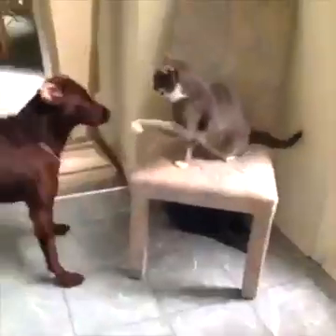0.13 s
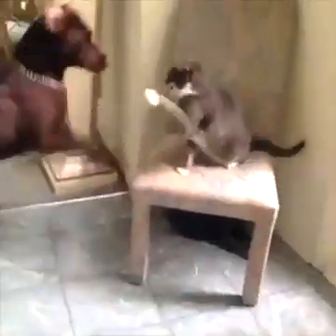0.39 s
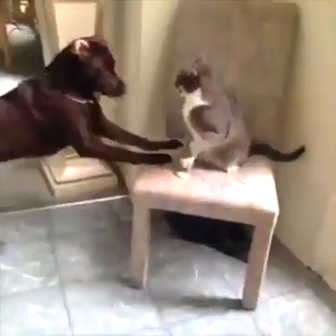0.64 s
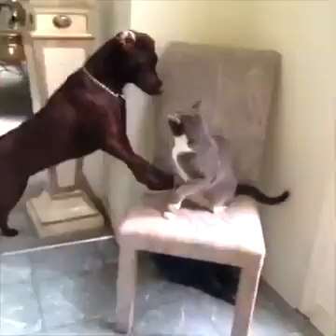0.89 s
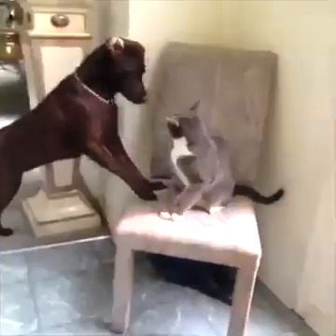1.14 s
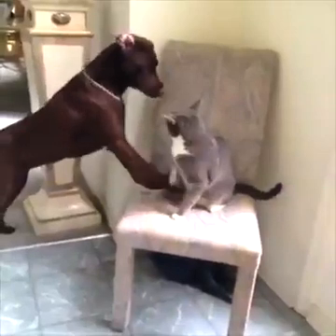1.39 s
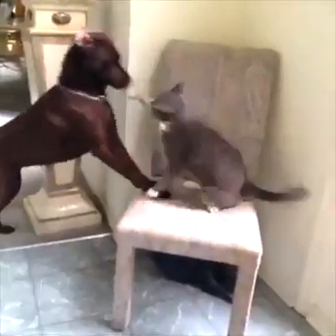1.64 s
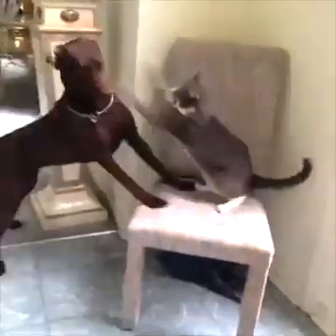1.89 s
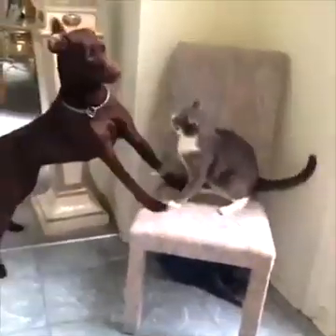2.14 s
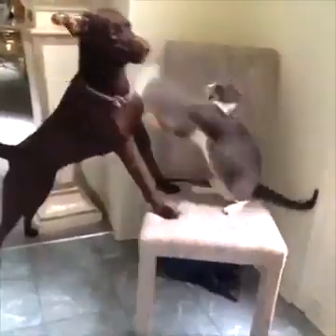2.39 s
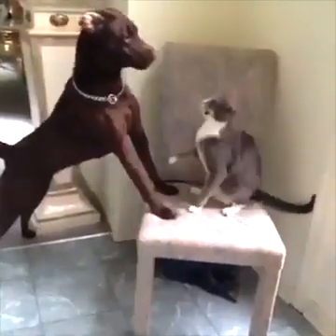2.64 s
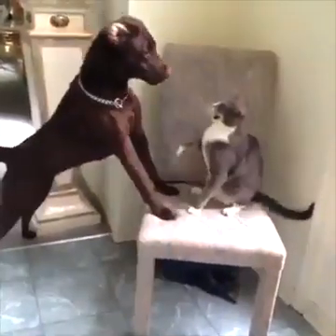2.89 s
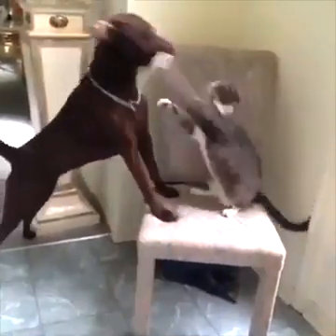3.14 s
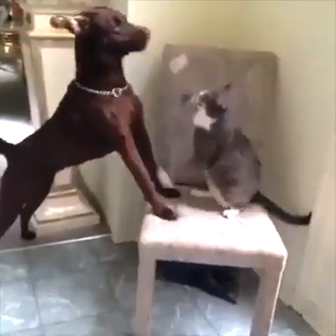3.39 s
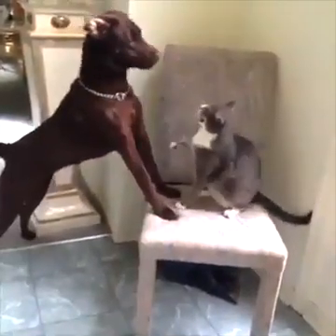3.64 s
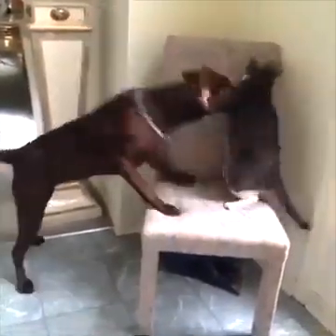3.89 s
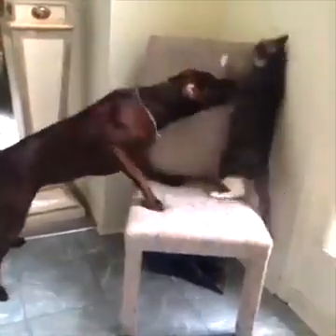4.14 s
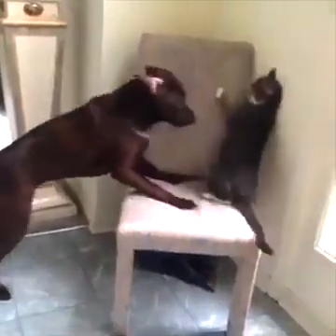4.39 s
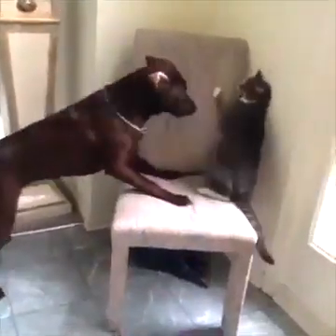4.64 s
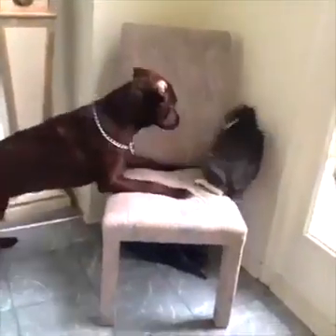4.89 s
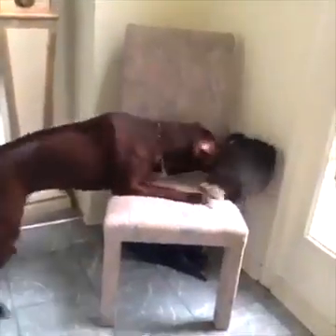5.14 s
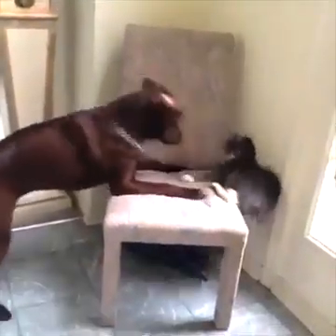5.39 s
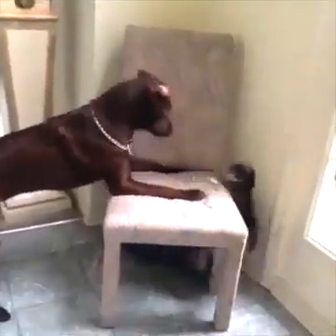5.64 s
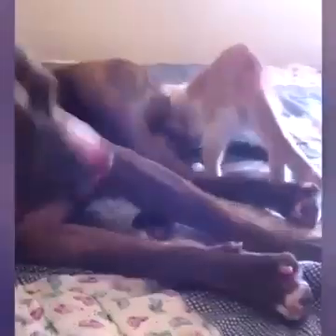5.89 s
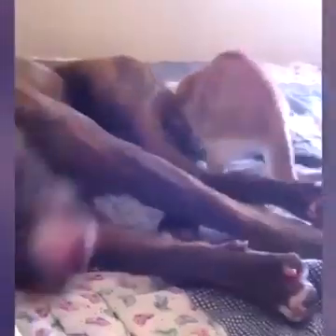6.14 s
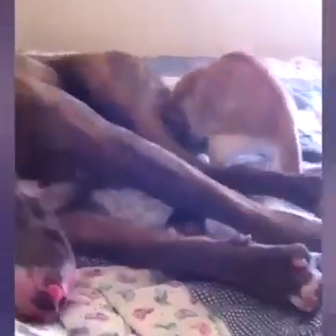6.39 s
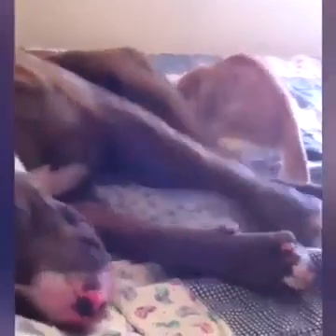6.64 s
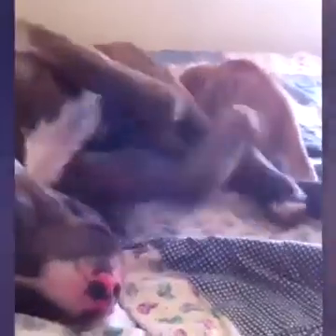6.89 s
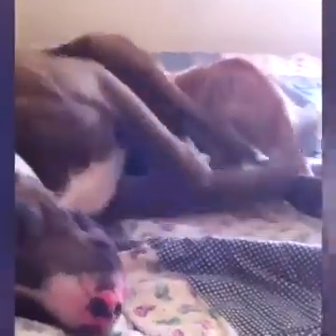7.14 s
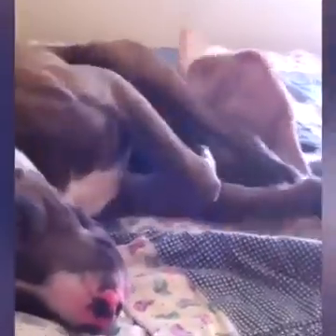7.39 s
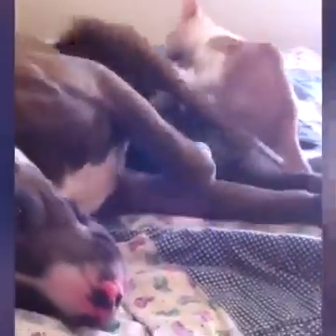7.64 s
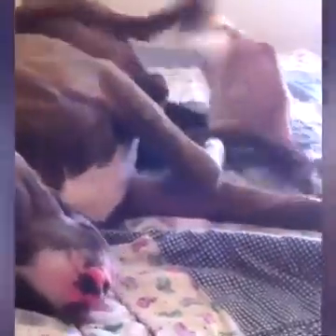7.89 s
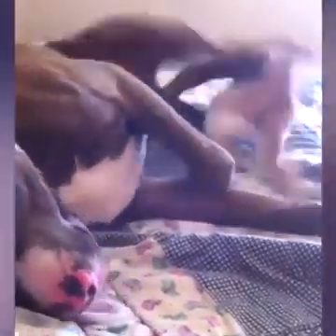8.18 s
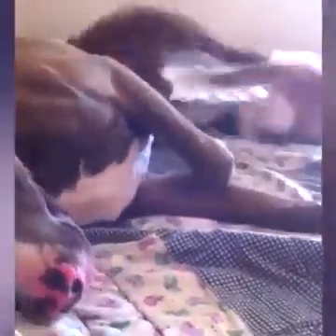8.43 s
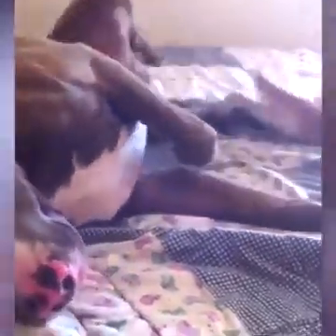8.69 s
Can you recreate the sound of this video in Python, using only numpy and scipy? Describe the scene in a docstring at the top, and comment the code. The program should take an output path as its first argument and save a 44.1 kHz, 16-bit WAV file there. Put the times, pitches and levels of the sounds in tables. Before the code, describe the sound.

Bursts of grainy claw scrabbling and woody knocks come first, then a lull of faint shuffling and airy cat hisses. A sharp knock breaks it, followed by violent banging, rasping paw drags and rattling stool legs with a short bright room echo. A quick switch brings a much quieter, drier bedroom: one brisk cloth crumple, softer rustles and muffled mattress thumps. Plain close phone-like pickup, little deep bass.

```python
"""Scuffle on a stool, then a bedroom

A dog and a cat scuffle on a padded wooden stool in a tiled room: blows ring its modes, stick-slip judders its legs,
claws and fur scrape as grainy noise, the cat hisses thinly as high noise. A filter removes the scuffle's deep bass.
Then a cut to a quiet bedroom, where bedding rustles under two animals in bursts of grains and dull thumps."""
import sys
import numpy as np
from scipy import signal
from scipy.fft import rfft, irfft, next_fast_len
from scipy.io import wavfile
from scipy.ndimage import uniform_filter1d, map_coordinates

SR = 44100
rng = np.random.default_rng(int(sys.argv[2]) if len(sys.argv) > 2 else 0)


def digitize_waveform(pressure):
    """Quantize a signal to 16-bit integers and store it at the path in sys.argv[1].

    Rows of a 2-D input are taken as channels; values are limited to [-1, 1].
    """
    field = np.atleast_2d(pressure).T
    bounded = np.clip(field, -1, 1)
    quanta = np.round(bounded * 32767).astype(np.int16)
    wavfile.write(sys.argv[1], SR, quanta)


def natural_amplitude(level_db):
    """Convert a level in decibels to a linear amplitude factor, elementwise."""
    exponent = np.asarray(level_db, float) / 20
    return 10 ** exponent


N = 387706
T = np.arange(N) / SR
CUT_S = 5.775  # tiled room to bedroom

# Blows of paws, claws and stool legs. Each row: time in seconds, peak of the frame knock in dB,
# level of the claw crack in dB, strongest pitch in Hz.
BLOWS = [(0.198, -39, -56, 316), (0.216, -24.5, -19.5, 290), (0.288, -27.5, -36, 200),
         (0.372, -26.5, -41, 237), (0.561, -35, -27, 1270), (0.59, -19.5, -15, 840),
         (0.892, -19.5, -27, 637), (1.166, -17, -59, 596), (1.176, -14.5, -55, 620), (1.205, -23, -58, 171),
         (1.26, -25.5, -60, 180), (1.506, -28, -65, 635), (1.655, -18.5, -29.5, 720),
         (1.709, -16, -27, 1180), (1.726, -19, -40, 300), (1.805, -27, -25, 620), (2.515, -30, -50, 590),
         (2.701, -24.5, -48, 343), (2.737, -36, -50, 800), (3.161, -7.5, -23, 820), (3.201, -22, -60, 790),
         (3.233, -16, -53, 790), (3.238, -26, -62, 178), (3.263, -21.5, -36, 432), (3.487, -35, -46, 644),
         (4.034, -31, -36.5, 640), (4.09, -21, -37, 790), (4.256, -6.5, -38, 844), (4.262, -11, -67, 211),
         (4.377, -4, -12, 1030), (4.585, -14.5, -30, 700), (4.614, -11.5, -23.5, 1010),
         (4.645, -26.5, -49, 630), (4.68, -22, -57, 820), (4.895, -22, -49, 790), (5.174, -16, -45, 750),
         (5.184, -15.5, -39, 437), (5.224, -15, -26, 870), (5.242, -13.5, -18.5, 607),
         (5.266, -17.5, -14.5, 1190), (5.392, -4, -26, 1110), (5.408, -8, -23, 990),
         (5.531, -21.5, -33, 630), (5.574, -18.5, -52, 304), (5.598, -17, -55, 300),
         (5.641, -12.5, -28, 946), (5.667, -18, -27, 800), (5.672, -18, -53, 247), (5.749, -18, -47, 695)]
# Modes of the seat. Each row: frequency in Hz, nominal width in Hz, relative level in dB.
SEAT_MODES = [(45, 84, -4), (151.3, 75, -1), (209, 62, 2), (335, 159, -1.5)]
# Modes of legs and rails. Each row: frequency in Hz, nominal width in Hz, relative level in dB.
LEG_MODES = [(424.4, 61, 1.4), (637.4, 100, 2.8), (790, 175, 3.44), (979, 137, -3.7), (1222, 162, -2.4)]
# Faint shuffling between the bouts. Each row: time in seconds, stool level in dB, cloth level in dB.
SHUFFLE = [(0, -62, -57), (1.0, -54.5, -62), (1.45, -58.5, -60), (1.58, -59, -56), (1.95, -52, -57.5),
           (2.3, -69, -64.5), (2.34, -55, -59.5), (2.75, -52, -56), (2.77, -92, -69), (3.07, -82, -61.5),
           (3.4, -62, -60), (3.6, -77, -64.5), (3.72, -56.5, -60.5), (3.92, -67, -56.5), (4.87, -56.5, -63),
           (5.1, -59.5, -61)]


def unit(x):
    """Scaled to rms 1."""
    return x / np.sqrt(np.mean(x ** 2) + 1e-20)


def along(points, hz):
    """(Hz, value) points interpolated on a log frequency axis."""
    f, v = np.transpose(points)
    return np.interp(np.log(hz + 1), np.log(f + 1), v)


def curves(rows):
    """One value per sample for each column after the time."""
    s, *cols = np.transpose(rows)
    return [np.interp(T, s, c) for c in cols]


def filtered(x, response):
    """x times a complex response of frequency."""
    m = next_fast_len(len(x) + 8192)
    return irfft(rfft(x, m) * response(np.fft.rfftfreq(m, 1 / SR)), m)[:len(x)]


def coloured(x, spectrum):
    """x filtered by a spectrum of (Hz, dB), rms 1."""
    return unit(filtered(x, lambda hz: natural_amplitude(along(spectrum, hz))))


def wobble(rate):
    """A smooth random curve, rate knots a second."""
    return map_coordinates(rng.standard_normal(int(N * rate / SR) + 4), [T * rate])


def grains(rate, spread_db, smooth):
    """Random single contacts, rate a second, of uneven size on a bed of smooth friction noise, rms 1."""
    chance, size = rng.random(N), rng.exponential(size=N)
    sign, bed = rng.standard_normal(N), rng.standard_normal(N)
    height = natural_amplitude(spread_db * np.minimum(size, 2.5)) * np.sign(sign)
    contacts = unit((chance < rate / SR) * height)
    return unit(contacts + smooth * bed)


def patchy(x, depth_db):
    """Random gain patches a few hundred Hz wide and some tens of ms long, rms 1."""
    z = signal.stft(x, nperseg=512)[2]
    field = uniform_filter1d(rng.standard_normal(z.shape), size=3, axis=0)
    field = uniform_filter1d(field, size=9, axis=1)
    return unit(signal.istft(z * natural_amplitude(depth_db * unit(field)), nperseg=512)[1][:N])


def resonant(x, modes, twice=False):
    """x through the causal response of (Hz, width, dB) modes, rms 1; twice: first mode only, two times."""
    def mode(hz, centre, width, db):
        return natural_amplitude(db) * 1j * hz * width / (centre * centre - hz * hz + 1j * hz * width)

    def response(hz):
        if twice:
            return mode(hz, *modes[0]) ** 2
        return sum((-1) ** k * mode(hz, *m) for k, m in enumerate(modes))

    return unit(filtered(x, response))


def bursts(rows, fade, bed_db, axis):
    """Gain of one layer: the energy of all its events, by one rule of swell, sag and release, over a faint bed."""
    swell_db, sag_db_per_s, release_db_per_s = fade  # swell_db: gained over one rise
    stop_s = 2.757  # bursts begun earlier are cut dead here
    power = natural_amplitude(2 * bed_db)
    for row in rows:
        peak_s, rise_s, lasts_s = row[0], max(row[1], .002), max(row[2], 0)
        limit_s = stop_s if peak_s < stop_s else CUT_S + 1
        first = max(round((peak_s - 2 * rise_s) * SR), 0)
        last = round(min(peak_s + lasts_s + .5, limit_s) * SR)
        t = T[first:last] - peak_s
        fall_db = sag_db_per_s * np.minimum(t, lasts_s) + release_db_per_s * np.maximum(t - lasts_s, 0)
        loss_db = np.where(t < 0, -swell_db * t / rise_s, fall_db)
        power[first:last] += natural_amplitude(2 * (row[axis] - loss_db))
    return np.sqrt(power)


def still_air():
    """The hush of each room: coloured noise whose level drifts."""
    # Each row: frequency in Hz, relative level per Hz in dB.
    tiled_spectrum = [(50, -46), (90, -35.5), (140, 1), (500, 2.5), (1000, -2.5), (3000, -22),
                      (8500, -42.5), (9400, -20), (9550, -70.5)]
    # Each row: frequency in Hz, relative level per Hz in dB.
    bedroom_spectrum = [(15, -48), (28, -8), (60, -29), (115, -1), (400, -2.5), (900, -7.5), (3800, -17),
                        (7800, -19), (8050, -33), (8600, -31), (8800, -77)]
    tiled = natural_amplitude(-57.5 + 5.0 * wobble(3.11)) * coloured(rng.standard_normal(N), tiled_spectrum)
    bedroom = patchy(coloured(rng.standard_normal(N), bedroom_spectrum), depth_db=2.5)
    return tiled, natural_amplitude(-58.5 + .6 * wobble(4)) * bedroom


def tiled_room(x):
    """The hard room's answer: a noise tail in which each frequency dies at its own speed."""
    # Decay of the tiled room. Each row: frequency in Hz, t60 in seconds.
    room_decay = [(150, 0.23), (1000, 0.38), (8000, 0.57)]
    hz, t, z = signal.stft(rng.standard_normal(SR // 2), SR, nperseg=256)
    fading = z * natural_amplitude(-60 * t / along(room_decay, hz)[:, None])
    tail = signal.istft(fading, SR, nperseg=256)[1]
    delayed = np.pad(x, (250, 0))  # samples
    return signal.fftconvolve(delayed, tail / np.linalg.norm(tail))[:N]


def bedding():
    """Cloth crumples in short grainy bursts; the mattress gives a dull thump."""
    # Pushes of limbs. Each row: start in seconds, crumple level in dB before trim, thump level in dB,
    # rise time constant in seconds, t60 in seconds.
    push_rows = [(6.7694, -42, -56, 0.022, 0.44), (7.014, -30.5, -49.5, 0.0059, 0.32),
                 (7.339, -39.5, -52.5, 0.0062, 0.24), (7.6494, -43.5, -59, 0.0085, 0.23),
                 (7.8594, -49, -65, 0.0054, 0.26), (8.2094, -47, -70, 0.0096, 0.74),
                 (8.345, -47, -43.5, 0.0085, 0.29), (8.503, -41.5, -57, 0.0037, 0.62)]
    # Each row: frequency in Hz, relative level per Hz in dB.
    cloth_spectrum = [(240, -42), (400, -11), (770, 8), (2500, 2.5), (7800, -4), (8050, -23), (8700, -18),
                      (9000, -74)]
    crumple_trim_db = -10.0
    crumple, thump = np.zeros(N), np.zeros(N)
    for start_s, crumple_db, thump_db, rise_s, t60_s in push_rows:
        t = np.maximum(T - start_s, 0)
        shape = (1 - np.exp(-t / rise_s)) * natural_amplitude(-60 * t / t60_s)
        crumple += natural_amplitude(crumple_db + crumple_trim_db) * shape
        thump += natural_amplitude(thump_db) * shape
    for snap_s in (7.016, 7.028):  # a claw snaps free of the weave, twice
        crumple += natural_amplitude(-37.0 - 60 * np.abs(T - snap_s) / 0.0085)
    cloth = coloured(grains(rate=1300, spread_db=-4.0, smooth=3.1), cloth_spectrum)
    mattress_spectrum = [(80, -33), (180, -1.5), (450, -3.5), (1300, -18.5), (2500, -57)]
    mattress = coloured(rng.standard_normal(N), mattress_spectrum)
    return crumple * cloth + thump * mattress


def hisses():
    """Air forced past the cat's teeth: smooth, high noise with a quick start."""
    # Each row: start in seconds, length in seconds, level in dB.
    hiss_rows = [(2.273, 0.49, -53.5), (2.886, 0.24, -59.5), (3.654, 0.22, -54.5), (3.993, 0.02, -42.5)]
    # Each row: frequency in Hz, relative level per Hz in dB.
    hiss_spectrum = [(4500, -61), (6500, 2), (8000, 8), (9400, 7), (9550, -63)]
    breath = np.zeros(N)
    for start_s, length_s, db in hiss_rows:
        onset = np.clip((T - start_s) / 0.011, 0, 1)
        ending = np.clip((start_s + length_s - T) / 0.007, 0, 1)
        breath += natural_amplitude(db) * onset * ending
    flutter = natural_amplitude(1.5 * wobble(25))
    return breath * flutter * patchy(coloured(rng.standard_normal(N), hiss_spectrum), depth_db=1.5)


def rubbing():
    """Claws tear over the weave in small even grains; fur adds a treble that clumps slightly, pads a dull rasp."""
    # Strokes of claws and fur. Each row: peak in seconds, rise in seconds (at least 2 ms is used),
    # drag time in seconds, scrape level in dB, fizz level in dB.
    stroke_rows = [(0, .01, 0, -50.5, -42), (.1, 0.049, 0, -62, -30.5), (.203, 0.018, 0.1, -29, -21.5),
                   (.356, 0.034, 0.32, -27.5, -27), (.51, 0.044, 0.023, -41, -32.5),
                   (.592, 0.00089, 0.04, -24.5, -25), (.619, 0.072, 0.11, -29, -31.5),
                   (.829, 0.043, 0.09, -24, -23), (1.18, 0.018, 0.082, -34, -52),
                   (1.614, 0.016, 0.008, -46, -44), (1.7, 0.049, 0.18, -31, -35),
                   (2.53, 0.048, 0.19, -55, -48.5), (2.62, 0.018, 0.065, -57, -42.5),
                   (3.162, 0.003, 0.2, -40, -39), (3.374, 0.12, 0.11, -47.5, -41),
                   (3.69, 0.043, .25, -54, -58), (4.094, 0.063, 0.036, -29, -33.5),
                   (4.21, 0.061, 0.13, -38, -56), (4.335, 0.011, 0.16, -32.5, -34),
                   (4.376, 0.056, 0.08, -25, -32), (4.448, 0.012, 0.18, -28.5, -28),
                   (4.616, 0.0029, 0.1, -31.5, -39), (4.897, 0.0055, 0.033, -36, -62),
                   (4.935, 0.013, 0, -34, -53), (5.242, 0.045, 0.1, -22.5, -31.5),
                   (5.395, 0.0093, 0, -20.5, -26.5), (5.43, 0.013, 0.11, -25.5, -31.5),
                   (5.59, 0.043, 0.13, -40.5, -46), (5.641, 0.0053, 0.19, -31.5, -41),
                   (5.72, 0.2, 0.18, -43, -48)]
    # Quick flicks of a claw. Each row: peak in seconds, scrape level in dB, fizz level in dB.
    flick_rows = [(0.164, -62, -24.5), (1.175, -32, -64), (1.655, -25.5, -39), (2.737, -29, -33),
                  (4.614, -21, -52), (5.182, -18.5, -35.5)]
    # Paw pads dragged heavily over the cushion. Each row: peak in seconds, rise in seconds,
    # drag time in seconds, level in dB.
    drag_rows = [(.593, 0.006, 0.017, -28.5), (1.7, 0.069, 0.14, -30), (4.21, 0.034, 0.03, -37.5),
                 (4.26, 0.011, 0.094, -34), (4.93, 0.025, 0.024, -45), (5.24, 0.023, 0.05, -22.5),
                 (4.39, 0.024, 0.053, -30.5), (4.62, 0.0042, 0.062, -30.5), (5.43, 0.029, 0.044, -27),
                 (5.645, .005, 0.14, -31.5)]
    # Claw scrape. Each row: frequency in Hz, relative level per Hz in dB.
    scrape_spectrum = [(600, -43.5), (1150, -12.5), (1500, -2.5), (2250, 1), (3700, -3.5), (4200, -12),
                       (6500, -19.5), (9400, -23.5), (9550, -86)]
    # Fur fizz. Each row: frequency in Hz, relative level per Hz in dB.
    fizz_spectrum = [(2500, -21.5), (4200, -1.5), (6000, -3.5), (8500, -9), (9400, -5.5), (9550, -47.5)]
    # Dull pads. Each row: frequency in Hz, relative level per Hz in dB.
    drag_spectrum = [(500, -27), (900, 10), (1500, 18), (2200, 12), (2800, -50.5)]
    # fades: swell in dB, sag in dB/s, release in dB/s
    scrape_fade, fizz_fade, flick_fade = (15.9, 63, 210), (17.6, 90, 237), (28, 0, 1900)
    no_bed_db = np.full(N, -120.)
    cloth_db = curves(SHUFFLE)[1]
    flicks = [(s, 0.002, 0, scrape_db, fizz_db) for s, scrape_db, fizz_db in flick_rows]  # 2 ms rise
    claws = bursts(stroke_rows, scrape_fade, cloth_db, axis=3)
    claws += bursts(flicks, flick_fade, no_bed_db, axis=3)
    fur = bursts(stroke_rows, fizz_fade, cloth_db - 5, axis=4)  # shuffling: fizz 5 dB under scrape
    fur += bursts(flicks, flick_fade, no_bed_db, axis=4)
    unevenness = wobble(45)
    scrape = patchy(coloured(grains(rate=700, spread_db=2.5, smooth=1.5), scrape_spectrum), depth_db=1.8)
    fizz = patchy(coloured(grains(rate=1200, spread_db=1, smooth=1.45), fizz_spectrum), depth_db=1.5)
    rasp = coloured(grains(rate=600, spread_db=5.5, smooth=1.1), drag_spectrum)
    pads = bursts(drag_rows, scrape_fade, no_bed_db, axis=3) * rasp
    return pads + claws * natural_amplitude(0.074 * unevenness) * scrape + fur * natural_amplitude(2.0 * unevenness) * fizz


def rail_shares():
    """Gain of each rail mode over time: those nearest the pitch of the last blow on the rails judder most."""
    near_db_per_octave = 6.5
    rail_blows = [blow for blow in BLOWS if blow[-1] > SEAT_MODES[-1][0] * 1.2]
    blow_s, *_, struck_hz = np.transpose(rail_blows)
    share = np.array([natural_amplitude(db - near_db_per_octave * np.abs(np.log2(hz / struck_hz)))
                      for hz, _, db in LEG_MODES[:-1]])
    share /= np.sqrt(np.sum(share ** 2, axis=0))
    last_blow = np.maximum(np.searchsorted(blow_s, T) - 1, 0)
    return share[:, last_blow]


def judder():
    """The legs stick and slip at uneven moments; every slip rings the seat, and the rails that were struck last."""
    # Jolts of the stool. Each row: peak in seconds, rise in seconds (at least 2 ms is used),
    # judder time in seconds, seat thud level in dB, leg judder level in dB.
    jolt_rows = [(.012, 0.037, 0.02, -33.5, -44.5), (.228, 0.05, 0.042, -32.5, -56),
                 (.39, 0.064, 0.017, -38, -40), (.46, 0.11, 0.19, -47, -43),
                 (.592, 0.0069, 0.26, -42.5, -37), (.843, 0.072, 0.038, -32, -46),
                 (.891, 0.063, 0.054, -34.5, -31.5), (1.185, 0.02, 0.058, -31.5, -29),
                 (1.267, 0.098, 0.023, -32, -35.5), (1.506, 0.0034, 0.018, -45, -55),
                 (1.66, 0.018, 0.14, -31.5, -34), (1.742, 0.11, 0.089, -27.5, -30),
                 (3.17, 0.008, 0.06, -31.5, -34), (3.3, 0.15, 0.021, -35.5, -40.5),
                 (3.594, 0.058, 0.03, -49.5, -74), (4.056, 0.044, 0.26, -31.5, -34.5),
                 (4.2, 0.29, 0, -42, -37.5), (4.28, 0.013, 0.11, -28.5, -34), (4.404, 0.17, 0.18, -24, -20),
                 (4.615, 0.0049, 0.042, -31, -23), (4.677, 0.053, 0.12, -54, -29.5),
                 (4.896, 0.0027, 0.1, -59, -27.5), (4.97, 0.066, 0, -37.5, -28),
                 (5.176, 0.0026, 0.02, -34, -23), (5.236, 0.041, 0.18, -19, -18),
                 (5.393, 0.002, 0.17, -23.5, -19), (5.549, 0.11, 0.08, -24, -28),
                 (5.67, 0.018, 0.14, -28, -27.5)]
    seat_fade, legs_fade = (18, 90, 290), (15.8, 90, 450)  # swell in dB, sag in dB/s, release in dB/s
    slip_damping = 1.6  # rubbing legs ring broader than struck ones
    stool_db = curves(SHUFFLE)[0]
    thud = bursts(jolt_rows, seat_fade, stool_db - 3, axis=3)  # shuffling: seat 3 dB under legs
    shake = bursts(jolt_rows, legs_fade, stool_db, axis=4)
    slips = grains(rate=300, spread_db=1.0, smooth=1.47)
    seat = patchy(resonant(resonant(slips, SEAT_MODES[1:]), SEAT_MODES[1:]), depth_db=3.0)
    legs = np.zeros(N)
    for share, (hz, width_hz, _) in zip(rail_shares(), LEG_MODES):
        legs += share * resonant(slips, [(hz, slip_damping * width_hz, 0)], twice=True)
    return natural_amplitude(1.93 * wobble(40)) * (thud * seat + shake * unit(legs))


def blows():
    """Each blow rings the stool's modes nearest its pitch, with a short crack of claw or leg on top."""
    # Each row: frequency in Hz, relative level per Hz in dB.
    crack_spectrum = [(600, -47), (1500, 5.5), (4000, 3), (9000, -16.5), (11000, -120)]
    knock, crack, t = np.zeros(N + SR), np.zeros(N + SR), np.arange(SR // 8) / SR
    hz, width_hz, level_db = np.transpose(SEAT_MODES + LEG_MODES)[:, :, None]
    decay = np.exp(-np.pi * .45 * width_hz * t)  # struck modes ring narrower than nominal
    for s, knock_db, crack_db, pitch_hz in BLOWS:
        start = round(s * SR)
        uneven_db = 1.5 * rng.standard_normal(hz.shape)
        db_per_octave = np.where(hz > pitch_hz, 30, 15)
        strength = natural_amplitude(level_db + uneven_db - db_per_octave * np.abs(np.log2(hz / pitch_hz)))
        strength[0] = natural_amplitude(-8.5)  # any blow also rocks the whole stool on its lowest mode
        detune = 1 + .04 * rng.standard_normal(hz.shape)  # small and random: no two blows ring alike
        ring = np.sum(strength * decay * np.sin(2 * np.pi * hz * detune * t), axis=0)
        ring *= 1 - np.exp(-t / 0.00072)  # padded paws and cloth soften the first contact
        knock[start:][:len(t)] += natural_amplitude(knock_db) * ring / np.abs(ring).max()
        crack[start:][:len(t)] += natural_amplitude(crack_db - 60 * t / 0.039) * rng.standard_normal(len(t))
        crack[start] += natural_amplitude(crack_db + 11.5)  # the first touch is one sharp tick
    # rms gain of the crack filter for white noise
    white_rms = np.sqrt(np.mean(natural_amplitude(2 * along(crack_spectrum, np.linspace(0, SR / 2, 4096)))))
    bright = filtered(crack[:N], lambda hz: natural_amplitude(along(crack_spectrum, hz)))
    return knock[:N] + bright / white_rms


def scene():
    """The filtered scuffle fades out fast at the cut and the bedroom takes over."""
    # Overall response of the scuffle: deep bass removed, steps above 8.6 kHz, band limit near 10 kHz.
    # Each row: frequency in Hz, gain in dB.
    scuffle_response = [(30, -36.5), (90, -14), (130, -3.5), (8600, -4), (8750, -18), (9400, -21),
                        (10050, 8), (10150, -97)]
    hits = blows()
    tiled_air, bedroom_air = still_air()
    echoes = natural_amplitude(-3.5) * tiled_room(hits)
    scuffle = judder() + rubbing() + hisses() + hits + echoes + tiled_air
    second = np.clip((T - CUT_S) / 0.054 + .5, 0, 1)  # 54 ms crossfade
    heard = filtered((1 - second) ** 2 * scuffle, lambda hz: natural_amplitude(along(scuffle_response, hz)))
    return (heard + second * (bedroom_air + bedding()))[None]


def low_pass(x):
    """Removes everything above the highest recorded frequency."""
    return signal.sosfilt(signal.butter(12, 10080, fs=SR, output="sos"), x)


def record(dry):
    """Adds a trace of white converter noise."""
    mix = dry + natural_amplitude(-90) * rng.standard_normal(dry.shape)
    return low_pass(mix)


dry = scene()
out = record(dry)
digitize_waveform(out)
```